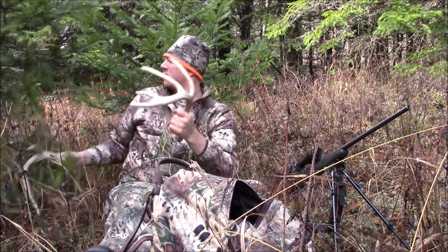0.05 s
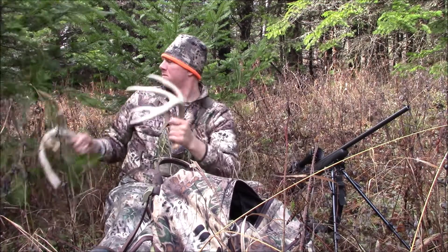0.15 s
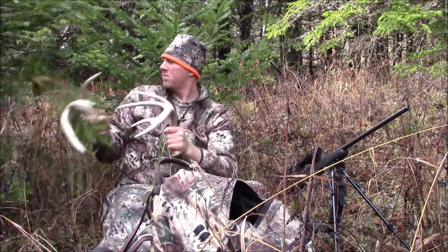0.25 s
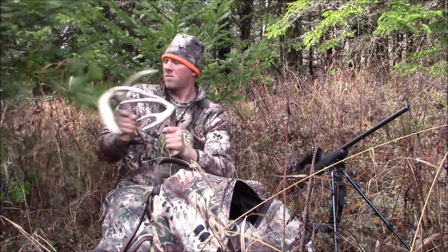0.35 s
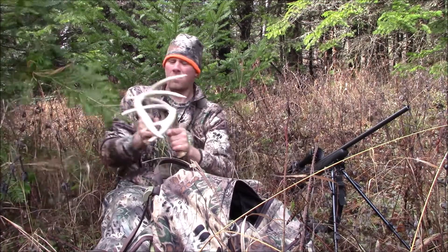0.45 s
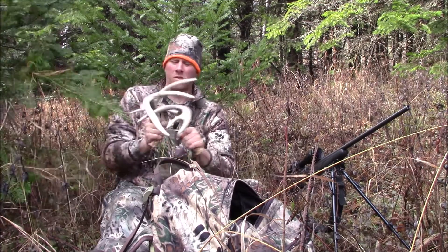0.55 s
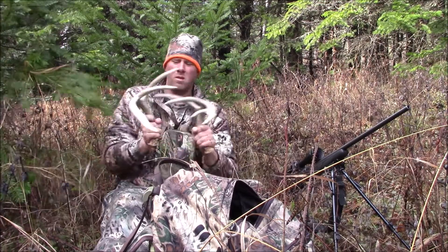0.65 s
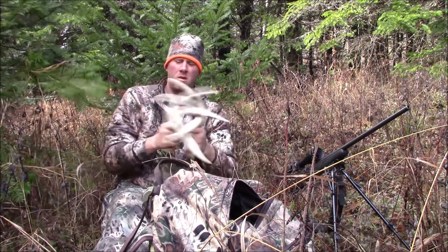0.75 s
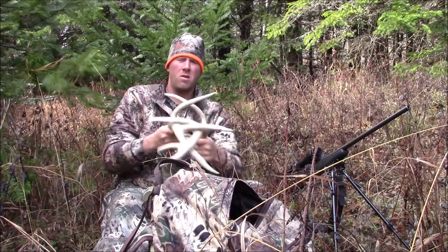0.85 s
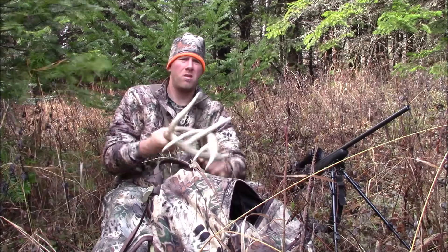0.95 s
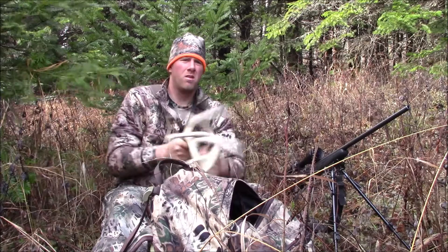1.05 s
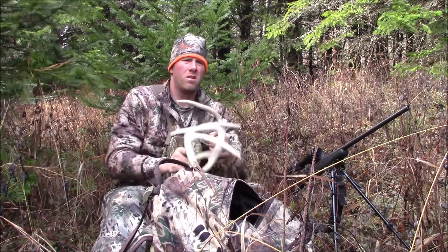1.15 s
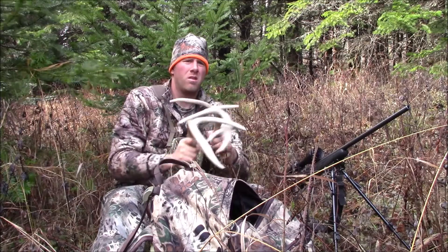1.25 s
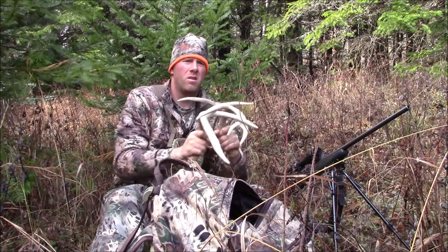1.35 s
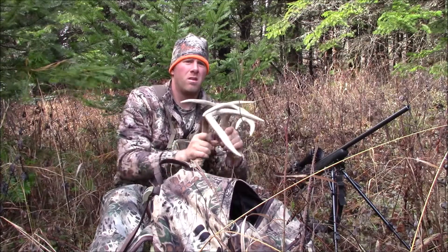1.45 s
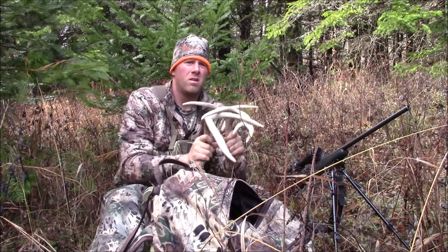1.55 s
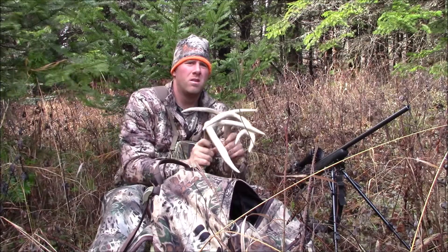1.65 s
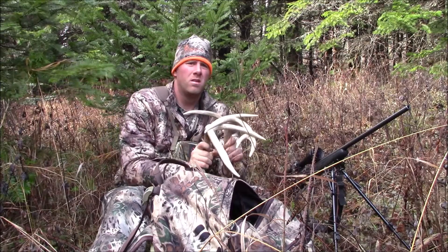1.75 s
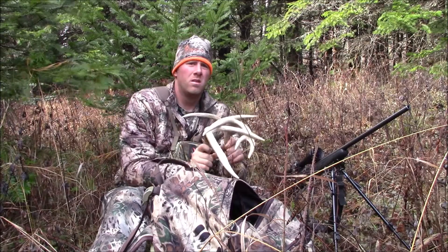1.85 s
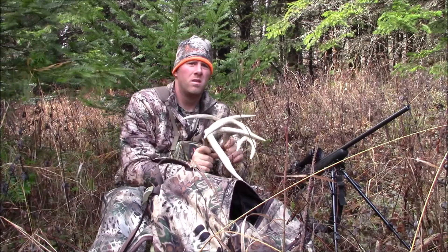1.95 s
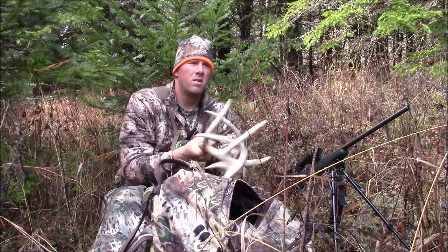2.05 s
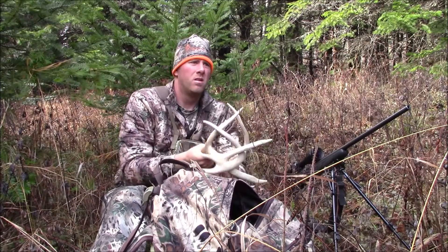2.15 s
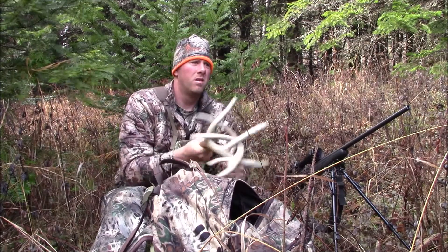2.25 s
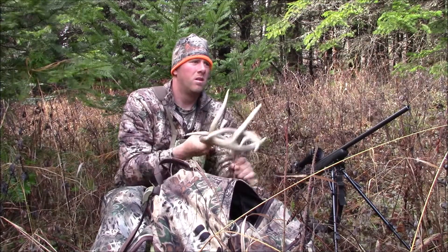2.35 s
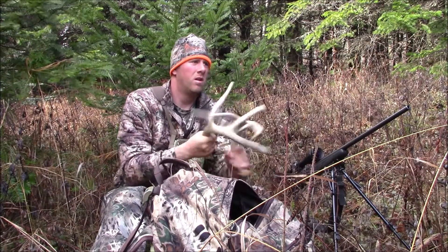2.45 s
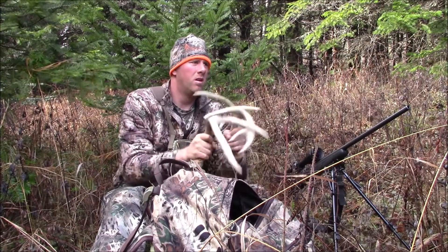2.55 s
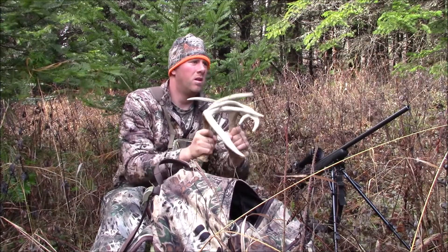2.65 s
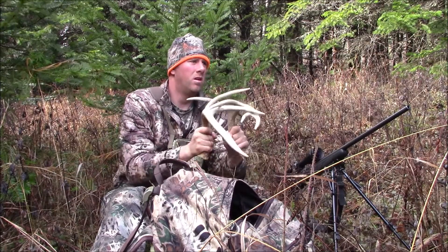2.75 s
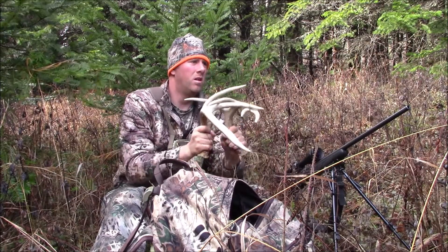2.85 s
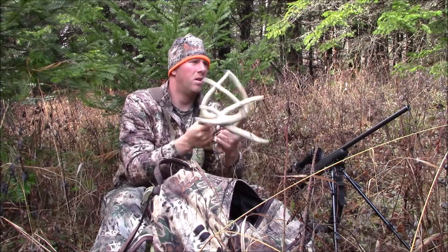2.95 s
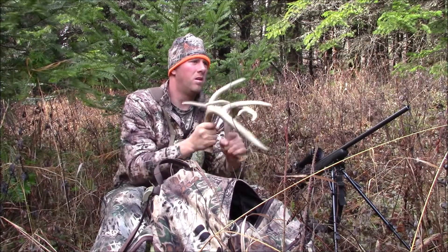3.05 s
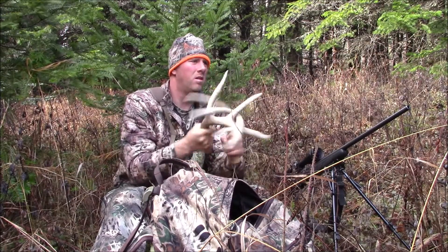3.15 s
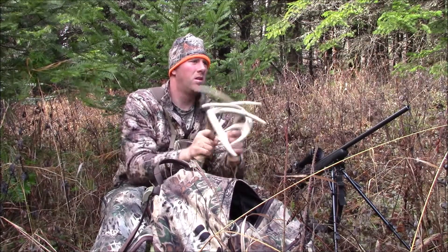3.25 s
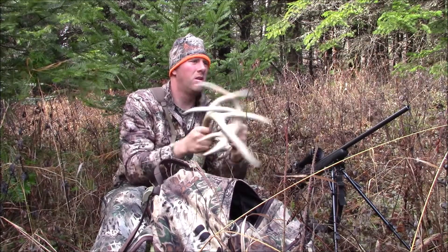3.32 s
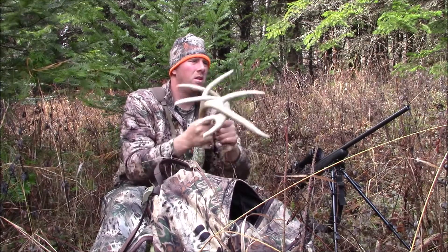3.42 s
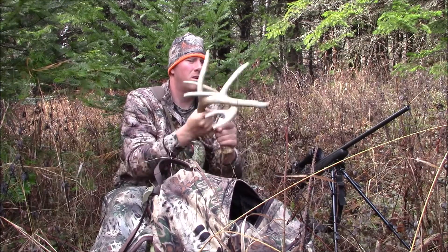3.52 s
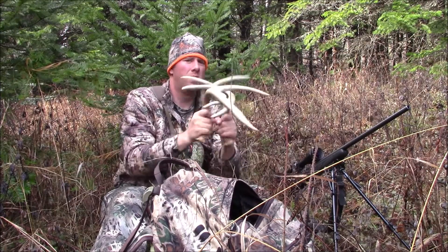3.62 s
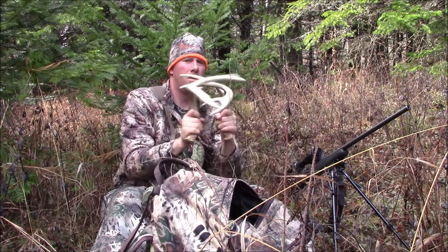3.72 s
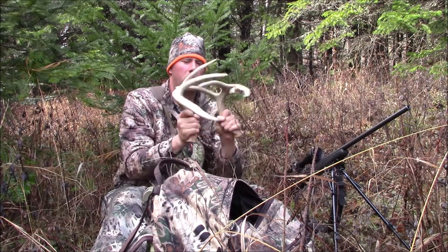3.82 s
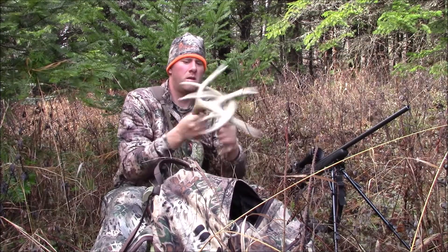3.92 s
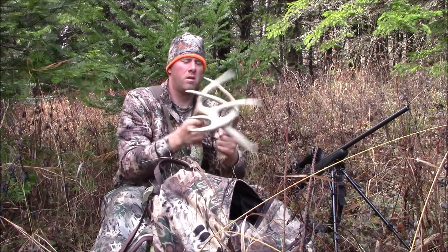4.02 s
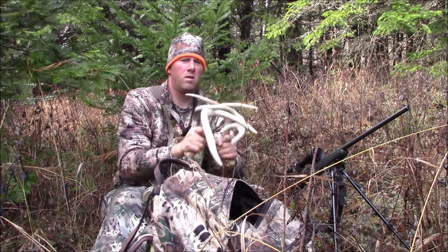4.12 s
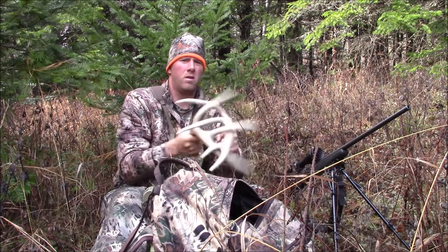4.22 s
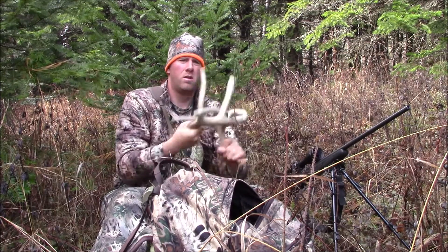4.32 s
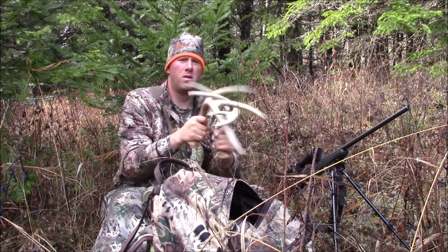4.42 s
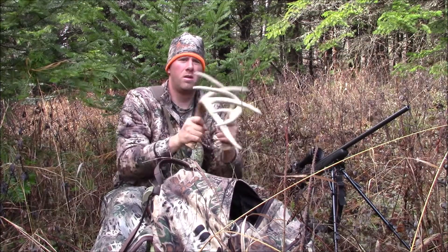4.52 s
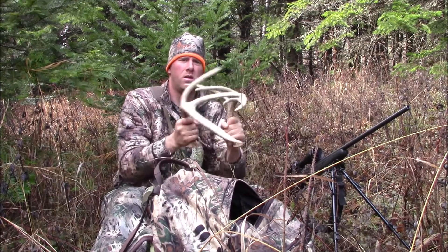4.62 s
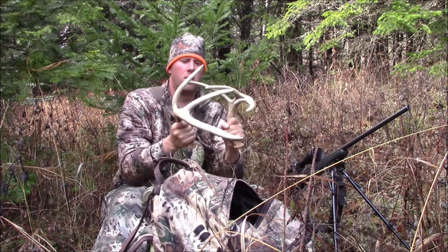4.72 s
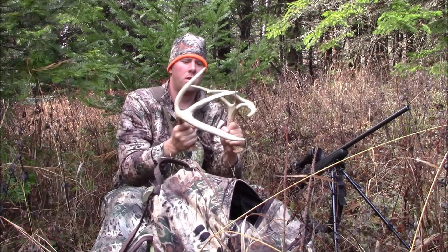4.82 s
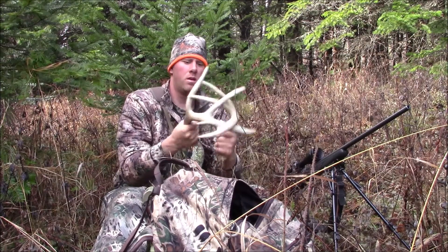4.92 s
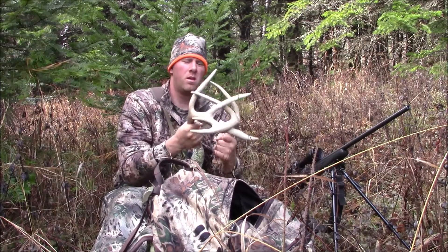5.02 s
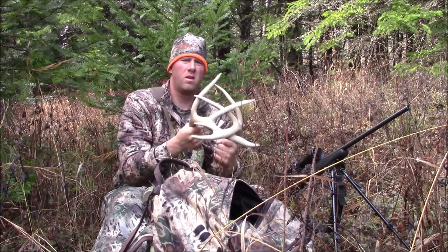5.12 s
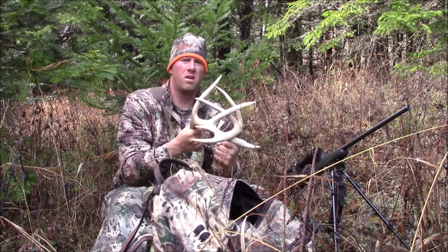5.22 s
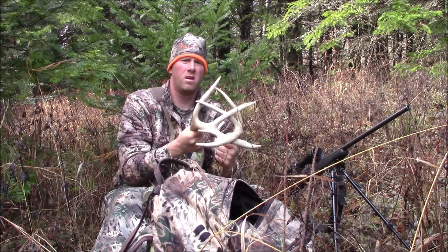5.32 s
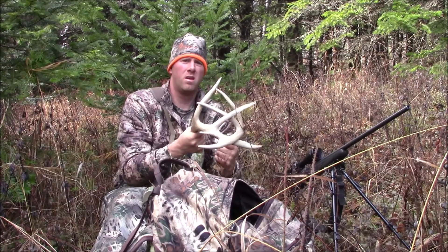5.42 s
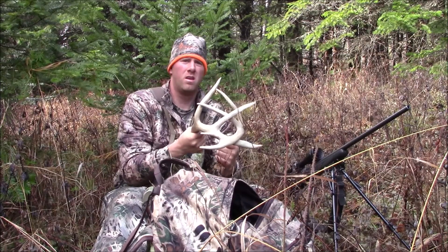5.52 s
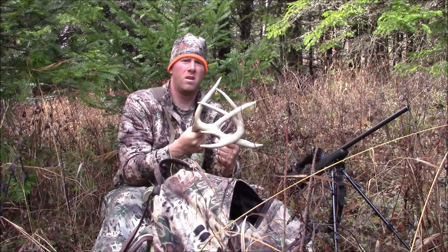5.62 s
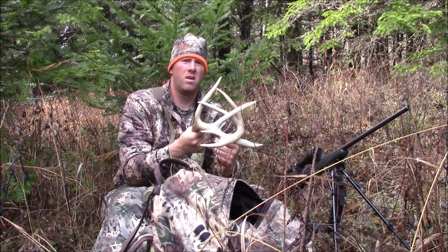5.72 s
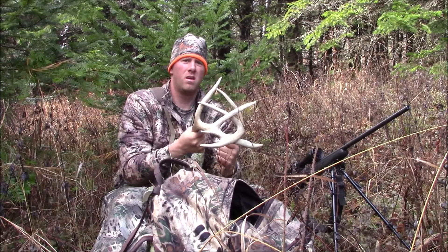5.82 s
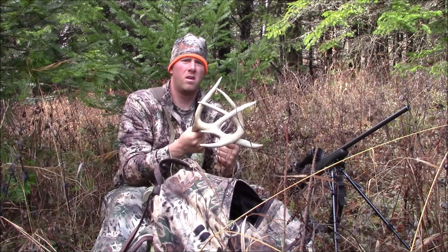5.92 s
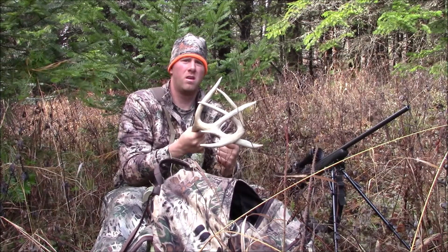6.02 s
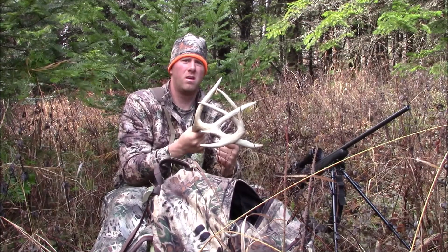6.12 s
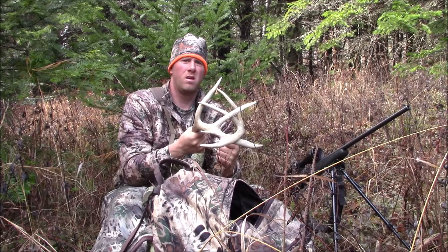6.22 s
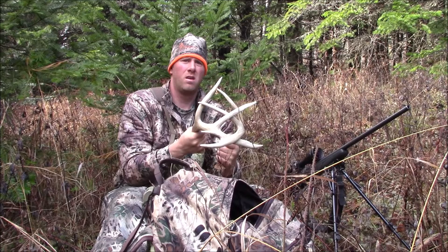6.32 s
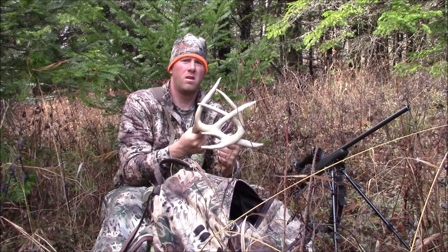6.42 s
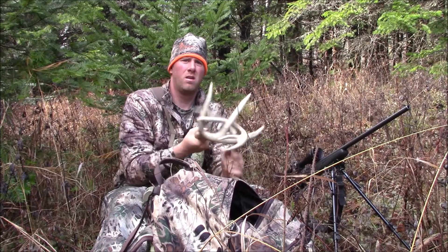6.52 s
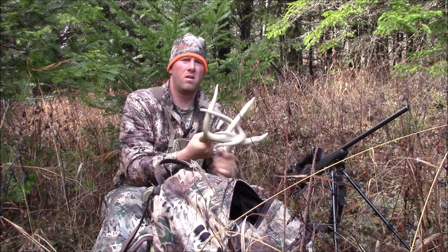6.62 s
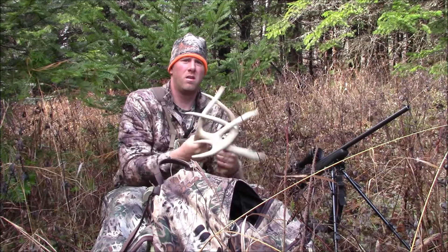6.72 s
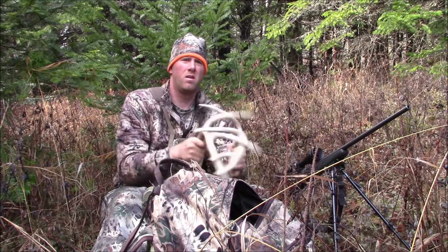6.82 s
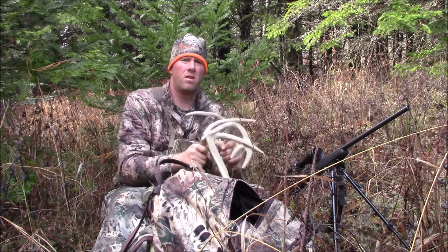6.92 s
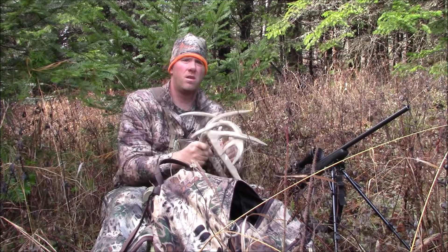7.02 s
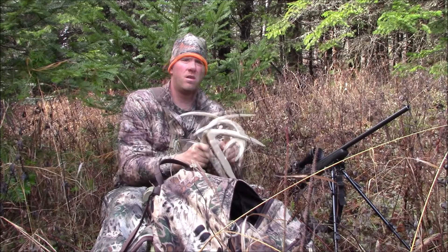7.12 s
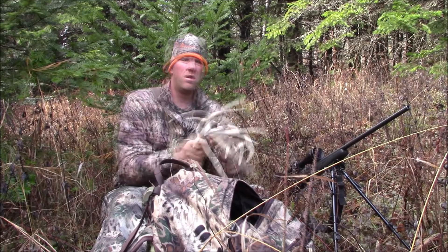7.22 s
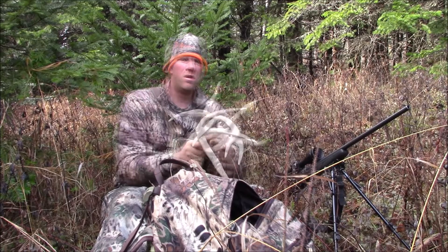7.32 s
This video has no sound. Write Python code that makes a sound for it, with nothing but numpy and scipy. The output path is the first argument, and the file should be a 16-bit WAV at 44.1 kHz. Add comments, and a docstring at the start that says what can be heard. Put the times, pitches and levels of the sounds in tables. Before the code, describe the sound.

A pair of deer antlers is clashed and rattled together in sharp, bony bursts at a forest edge, with a thin echo returning from the trees.

```python
"""A pair of deer antlers is clashed and ground together in bursts, a few metres from the microphone at a forest edge.
Each clack is a contact click plus decaying bone modes, repeated by a bouncing spray; slides are trains of tiny slips.
The trees return a thin tail: diffuse noise that follows the antlers and dies band by band, and a narrow lingering band.
A shaken bush rustles at first as patchy noise; a far cricket is a sine, stalks tick, and a quiet wood hisses behind."""
import sys
import numpy as np
from scipy import signal
from scipy.fft import rfft, irfft
from scipy.io import wavfile
from scipy.ndimage import uniform_filter1d

SR = 44100
rng = np.random.default_rng(int(sys.argv[2]) if len(sys.argv) > 2 else 0)


def invert_db(x):
    """Field ratio 10**(x/20) for x, a level in decibels (scalar or array-like)."""
    u = np.asarray(x, float) / 20
    return 10 ** u


def transcribe(signal):
    """Save signal, clipped to [-1, 1], as a 16-bit WAV file at the path in sys.argv[1]."""
    frames = np.atleast_2d(signal).T
    limited = np.clip(frames, -1, 1)
    pcm = np.round(limited * 32767).astype(np.int16)
    wavfile.write(sys.argv[1], SR, pcm)


N = 324576  # samples


def evened(x):
    """Scales to rms 1."""
    return x / np.sqrt(np.mean(x ** 2) + 1e-20)


def read(points, hz):
    """Reads a table on a log-frequency axis."""
    f, value = np.transpose(points)
    return np.interp(np.log(hz + 1), np.log(f + 1), value)


def add(mix, start_s, sound):
    """Mixes a two-channel sound in at start_s."""
    part = mix[:, round(start_s * SR):][:, :sound.shape[1]]
    part += sound[:, :part.shape[1]]


def diffuse(hz, frames, likeness, blur_bins, blur_frames):
    """Random spectra for left and right, as alike as the table says, and a map of drifting patches."""
    a, b, c, d, patches = rng.standard_normal((frames, len(hz), 5)).T
    patches = uniform_filter1d(patches, blur_bins, axis=0)
    patches = evened(uniform_filter1d(patches, blur_frames, axis=1))
    same = np.clip(read(likeness, hz), -1, 1)[:, None]
    left = a + 1j * b
    right = same * left + np.sqrt(1 - same ** 2) * (c + 1j * d)
    return np.array([left, right]), patches


def noise(spectrum, likeness, patchy_db, size):
    """Two channels of shaped noise at rms 1, with drifting patches in time and pitch."""
    hz = np.fft.rfftfreq(size, 1 / SR)
    z, patches = diffuse(hz, 4 * N // size + 5, likeness, size // 64, 6)
    z *= invert_db(read(spectrum, hz)[:, None] + patchy_db * patches)
    return evened(signal.istft(z, nperseg=size, noverlap=3 * size // 4)[1][:, :N])


# Tine meets tine in front of the microphone; level is the peak before the bass cut, sharpness is relative:
# start_s, level_db, pitch_hz (of the struck tine), sharpness_db
CLASHES = [(0.3904, -8.5, 3560, 0), (0.4135, -12, 2840, -12.5), (0.4725, -20, 1640, -28),
           (0.6281, -18.5, 2980, -4), (0.7637, 2, 3600, -6), (0.7655, -2, 3250, -8.5),
           (0.7802, -11, 3700, -9.5), (0.8094, 1.5, 3340, -18.5), (0.8216, -11.5, 3000, -21),
           (0.8357, -15, 1420, -19.5), (0.932, -20.5, 1680, -11.5), (0.9343, -17.5, 1730, -19),
           (0.955, -3, 2660, -19), (0.9722, -20.5, 2830, -27), (0.9857, -9.5, 2780, -23),
           (1.0004, -19, 1180, -8), (1.068, -19.5, 3940, -8), (1.0734, 3.5, 3066, -9),
           (1.0862, -3.5, 2970, -8.5), (1.09, -4.5, 2850, -4.5), (1.0955, 2, 2940, -8.5),
           (1.113, -4.5, 3070, -17), (1.1475, -17.5, 1310, -15), (1.1894, -35.5, 3010, -27.5),
           (1.2954, -12, 4000, -16.5), (1.3154, -23, 3080, -31), (2.0429, 2.5, 2144, -5),
           (2.0477, -2.5, 4410, -8), (2.0515, -5, 3030, -8), (2.0629, -0.5, 3001, -5),
           (2.0722, -6, 3320, -18), (2.0804, -13, 3000, -16), (2.3113, -28.5, 1010, -16),
           (2.318, -11.5, 3260, -33.5), (2.3195, -17.5, 2560, -29), (2.3278, -28.5, 1340, -23.5),
           (2.344, -31, 1300, -23), (2.357, -35.5, 1110, -25.5), (2.4549, -39.5, 4000, -2),
           (2.4984, 6.5, 3915, -4), (2.5139, -13.5, 3500, -19), (2.5322, -1, 3000, -12.5),
           (2.5527, -7.5, 2960, -15), (2.5848, -12.5, 2810, -18), (2.602, -22, 2160, -28),
           (2.926, 0.5, 3020, -9), (2.9368, -11.5, 2720, -19), (2.9477, 2, 2940, -3.5),
           (2.9609, 1.5, 3650, -9), (2.9621, -2.5, 4030, -2), (3.0489, -8, 2150, -20),
           (3.0619, -21, 3520, -23), (3.0937, -14, 3300, -23.5), (3.1513, -16.5, 2980, -41.5),
           (3.1739, -25.5, 2660, -13), (3.1864, -9, 2150, -17), (3.2117, -26.5, 1480, -15),
           (3.2202, -35, 1320, -20), (3.2333, -3, 2880, -17.5), (3.2427, -14.5, 3100, -25),
           (3.2492, -13.5, 1700, -14), (3.2653, -3.5, 3523, -7), (3.2831, -14.5, 2960, -6),
           (3.3107, -26, 2400, -12), (3.3177, -10.5, 2650, -16.5), (3.3337, -15, 2730, -13.5),
           (3.3468, -4, 2700, -13), (3.3584, -13.5, 3270, -17), (3.5027, -31, 1750, -34),
           (3.6011, -34, 1510, -33), (3.6135, -38.5, 1530, -11.5), (3.6903, -11.5, 2700, -20.5),
           (3.7039, -24.5, 3030, -22), (3.7262, -18.5, 3006, -21.5), (3.9277, .5, 2480, -9),
           (3.935, 1.5, 3170, -19.5), (3.9437, -.5, 2680, -9), (3.9496, -9.5, 2850, -24),
           (3.9613, -9, 3220, -15.5), (3.973, -6.5, 3010, -23.5), (4.061, -9.5, 4050, -18),
           (4.0739, -17.5, 2970, -16), (4.1642, -10, 3130, -22), (4.1752, -7, 3820, -2.5),
           (4.2039, -18.5, 3140, -10.5), (4.2519, -8.5, 2810, -12), (4.2722, -13.5, 2780, -15.5),
           (4.2847, -15, 1220, -21.5), (4.2983, -18, 2650, -25), (4.3071, -14, 2770, -16.5),
           (4.3196, -10.5, 1150, -19.5), (4.368, -40, 2920, -25), (4.429, -32, 1790, -18),
           (4.4505, -8.5, 3460, -12.5), (4.471, -19, 3270, -28.5), (4.4843, -21.5, 3830, -24.5),
           (4.492, -21, 3450, -18.5), (4.5552, -33.5, 1089, -17.5), (4.5748, -34.5, 1480, -18),
           (4.9277, 2.5, 4070, 0), (4.9323, 1.5, 3260, -9), (4.9485, -13, 3890, -17),
           (4.9559, -9.5, 3050, -12), (4.9622, -0.5, 3050, -5.5), (4.9738, -5, 3570, -4.5),
           (4.981, -12, 2880, -13.5), (4.9875, -22, 2930, -18.5), (6.5074, -24.5, 2350, -43),
           (6.5186, -30, 1556, -21), (6.5467, -18.5, 3110, -16.5), (6.5575, -26.5, 1505, -19.5),
           (6.654, -20, 2770, -25), (6.8016, 1, 3220, -10.5), (6.8026, -7.5, 3030, -14),
           (6.8169, -13, 1450, -20.5), (6.8446, -31.5, 3180, -26), (6.8593, .5, 4770, -3),
           (6.8696, -8.5, 3400, -20), (6.8872, -6, 3870, -12), (6.9971, -14.5, 4870, -0.5),
           (7.048, -33, 3600, -11), (7.1113, -25.5, 620, -24), (7.2307, -23.5, 2090, -22),
           (7.2389, -24, 2700, -20), (7.2827, -4.5, 2860, -12.5), (7.292, -29, 2850, 25),
           (7.2998, -20.5, 2090, -16), (7.3513, -12, 3110, -22)]
# The share of the low modes drifts from burst to burst, as the grip on the beams shifts: time_s, low_modes_db
GRIP_DRIFT = [(.4, -1), (.8, 2), (1.1, 3.5), (1.3, -4.5), (2.05, 0.5), (2.5, 0), (2.95, -4), (3.3, 0.5),
              (3.7, 0), (3.95, -1.5), (4.3, 2), (4.5, -3.5), (4.95, 0), (6.55, 0.5), (6.85, -0.5),
              (7.3, -1.5)]


def blows():
    """Each contact: a click and the ring of the bone, repeated by the chatter."""
    out = np.zeros((2, N))
    chance = rng.standard_normal((len(CLASHES), 8 * len(BONE_MODES) + 1280))
    for (start_s, level_db, pitch_hz, sharp_db), z in zip(CLASHES, chance):
        # low modes: less for hard blows, more where a thick low-pitched part is struck
        weight_db = -9 - 0.39 * level_db - 2.5 * np.log2(pitch_hz / 3000)
        weight_db += np.interp(start_s, *np.transpose(GRIP_DRIFT))
        sound = ring(level_db, pitch_hz, weight_db, sharp_db, .9, z[1280:].reshape(4, -1))
        sound /= abs(sound).max()
        sound[:, :256] += crack(sharp_db, z[:256])
        spray_ms = 3 * 2 ** (.2 * z[256])  # scattered by .2 octave
        sound = signal.fftconvolve(sound, chatter(spray_ms, z[256:1280])[None], axes=1)
        add(out, start_s, invert_db(level_db) * sound / abs(sound).max())
    return out


# What the bone rings with, before each contact reshapes it: pitch_hz, relative_level_db, base_t60_s
BONE_MODES = [(340, -20, 0.044), (498, -11, 0.03), (578, -9, .05), (644.2, -5.5, 0.046), (786, -6, 0.036),
              (898, -6.5, 0.035), (1119, -6.5, 0.064), (1297, -4.5, 0.076), (1448, -10.5, .08),
              (1457, 0, 0.036), (1685, -2.5, 0.056), (1888, -7, 0.061), (2150, -1, 0.021),
              (2350, -4.5, 0.039), (2700, -2, 0.021), (2850, -4, .04), (3050, -5, 0.06), (3260, -3, .03),
              (3560, -6, 0.059), (3744, -2, 0.044), (4060, -2, 0.033), (4397, -2.5, .03),
              (4690, -7.5, 0.021), (4903, 2, 0.023), (5440, -2.5, 0.029), (6020, -1.5, 0.024),
              (6650, 2.5, 0.015), (7670, -0.5, 0.017), (7462, 3, 0.0099), (8470, 1.5, 0.013),
              (9030, 0, 0.0076), (10360, -17, 0.0041)]


def ring(force_db, tine_hz, weight_db, sharp_db, longer, chance):
    """The modes of both antlers after one contact; where it lands decides how much each mode gets."""
    hz, db, t60 = np.transpose(BONE_MODES + BONE_MODES)[:, :, None]
    share, detune, phase, aside = chance[:, :, None]
    t = np.arange(2304, dtype=np.float32) / SR
    low = 1 / (1 + (hz / 1800) ** 4)
    high = 1 / (1 + (5600 / hz) ** 6)
    # the struck tine stands out, less so in soft knocks
    struck_db = (10.0 + 0.15 * force_db) * np.exp(-(np.log(hz / tine_hz) / 0.086) ** 2)
    heavy_db = 0.29 * force_db / (1 + (hz / 800) ** 4)  # only hard blows move the thick beams
    db = db + low * weight_db + high * sharp_db + struck_db + heavy_db + 2.3 * share
    turn = (2 * np.pi * hz * (1 + 0.023 * detune)).astype(np.float32) * t
    turn = turn + 1.5 * phase.astype(np.float32)
    # bending waves spread: high modes speak first, low ones swell in
    swell = 1 - np.exp(-t * (hz / 1.41).astype(np.float32))
    free_fall = np.exp(-t * (np.log(1000) / (t60 * longer)).astype(np.float32))
    # a quick first fall as the blow spreads through the branches, then the free ring
    fall = free_fall * (0.5 + np.exp(-t / 0.0015))
    shape = invert_db(db) * swell * fall
    # the two microphone ports see each mode from a slightly different side, more so at short wavelengths
    skew = .115 * aside * (hz / 3000) ** .5
    mid = (shape * np.sin(turn)).sum(0)
    side = (skew * shape * np.cos(turn)).sum(0)
    return np.array([mid + side, mid - side])


# Colour of the contact click: freq_hz, relative_level_db
CLICK_COLOUR = [(30, -31.5), (300, -17.5), (2000, -4), (6000, 3), (10000, -3.5), (13000, -26.5),
                (16000, -27.5), (17000, -51.5)]


def crack(sharp_db, chance):
    """The contact itself: a noise burst fading within a few milliseconds, coloured and set to a peak level."""
    burst = chance * np.exp(-np.arange(256) / SR / .0013)
    colour = invert_db(read(CLICK_COLOUR, np.fft.rfftfreq(512, 1 / SR)))
    click = irfft(rfft(burst, 512) * colour)[:256]
    return invert_db(-3.0 + sharp_db) * click / abs(click).max()


def chatter(ms, chance):
    """Knobbly bone never meets cleanly: the first touch, then a fading spray of smaller ones."""
    fade = np.exp(-np.arange(len(chance)) / SR / (max(ms, .2) / 1000))
    touches = 0.19 * chance * (abs(chance) > 2) * fade
    return np.append(1, touches[1:])


# Tines slide along each other at the same spot; level is rms before the bass cut, sharpness is relative:
# start_s, length_s, level_db, sharpness_db
GRINDS = [(.465, 0.028, -48.5, -23), (1.995, 0.025, -60.5, -4.5), (3.476, 0.021, -61.5, 0),
          (3.563, 0.057, -51, -24.5), (3.726, 0.044, -42, -12), (2.31, 0.053, -50, -23.5),
          (3.193, 0.057, -41.5, -12), (4.255, 0.069, -38, -26), (4.355, .07, -67, -18),
          (4.455, 0.042, -44.5, -22), (4.541, 0.038, -59.5, -21), (6.775, 0.025, -47.5, -12),
          (7.201, 0.069, -44, -22)]


def slides():
    """Rough bone on bone: a dense train of tiny slips through the same modes."""
    out = np.zeros((2, N))
    for start_s, length_s, level_db, sharp_db in GRINDS:
        count = round(length_s * SR)
        happens = rng.random(4000) < 2500 / SR  # 2500 slips per second on average
        slips = happens * invert_db(3.5 * rng.exponential(1, 4000))
        slips = slips[:count] * np.hanning(count) ** .7
        body = ring(-8.0, 1500, 0.071, sharp_db, .6, rng.standard_normal((4, 2 * len(BONE_MODES))))
        sound = signal.fftconvolve(slips[None], body, axes=1)
        rms = np.sqrt(np.mean(sound[:, :count] ** 2) + 1e-20)
        add(out, start_s, invert_db(level_db) * sound / rms)
    return out


# A narrow band of the echo near 3 kHz that lingers: pitch_hz, level_db, t60_s
LINGERING_ECHO_BAND = (3030, -14, .5)


def narrow_echo(x):
    """A narrow band of the echo near 3 kHz lingers after the contacts, made by a resonant filter."""
    hz, db, t60 = LINGERING_ECHO_BAND
    return invert_db(db) * signal.lfilter(*signal.iirpeak(hz, hz * t60 / 2.2, SR), x)


# How long the scatter from the surrounding trees lingers: freq_hz, t60_s
TREE_DECAY = [(300, 0.48), (700, 1), (1700, 1), (3500, 1), (5500, 0.88), (7500, 0.51), (9500, 0.49),
              (12000, .22)]
# Colour of that scatter: freq_hz, relative_level_db
TREE_COLOUR = [(200, -7), (800, -4), (3000, -7.5), (5000, -5.5), (6500, -2.5), (8500, -4), (10500, 1.5),
               (14000, 0)]
# How alike it reaches left and right: freq_hz, likeness (correlation, no unit)
TREE_LIKENESS = [(300, 0.063), (700, .2), (1500, 1), (3500, 1), (7000, 0.44), (14000, .2)]


def trees(x):
    """Trunks and twigs hear the antlers from every side, so their scatter is blurred power on diffuse noise."""
    hz, t, z = signal.stft(x.mean(0), SR, nperseg=256, noverlap=192)
    power = uniform_filter1d(abs(z) ** 2, size=7, axis=0)
    t60, late = read(TREE_DECAY, hz)[:, None], t[:1200]
    # near brush answers quickly, far trunks linger
    fall = invert_db(-60 * late / t60) + 1.7 * invert_db(-60 * late / (0.6 * t60))
    fall *= np.clip(late / 0.011 - .6, 0, 1)  # the first echo needs a few ms
    power = signal.fftconvolve(power, fall ** 2 / (fall[17] ** 2).sum(), axes=1)[:, :len(t)]
    z, patches = diffuse(hz, len(t), TREE_LIKENESS, 4, 24)  # uneven stands of trees
    z *= np.sqrt(abs(power)) * invert_db(read(TREE_COLOUR, hz)[:, None] + 1.3 * patches)
    return signal.istft(z, nperseg=256, noverlap=192)[1][:, :N]


# The bush swings to and fro; level is the rms at the crest of each swing: crest_s, level_db
BUSH_SWINGS = [(0.0, -48), (0.125, -47.5), (0.29, -52.5)]
# Colour of its leaves: freq_hz, relative_level_db
LEAF_COLOUR = [(120, -69), (200, -30.5), (601, -8), (1000, -9.5), (3190, -3), (4600, -6.5), (8120, -1.5),
               (14600, -19), (16000, -35)]


def bush():
    """Leaves brushing each other, patchy; every swing starts quickly and settles."""
    crest_s, level_db = np.transpose(BUSH_SWINGS)[:, :, None]
    late = np.arange(N) / SR - crest_s
    rise = np.clip(1 + late / .012, 0, 1)  # 12 ms up to the crest
    swings = invert_db(level_db - 44 * late) * rise  # settles by 44 dB per second
    likeness = [(200, .5), (12000, .4)]  # freq_hz, likeness
    return swings.max(0) * noise(LEAF_COLOUR, likeness, patchy_db=1.2, size=256)


# Dry stalks tick; the click peaks 3 dB below this level: start_s, level_db
STALK_TICKS = [(1.4964, -46), (1.6681, -42.5), (1.7014, -50), (1.7295, -46.5), (3.6274, -52)]


def stalks():
    """Dry stalks tick: the same short click as a contact, without any ring, a little stronger on the left."""
    out = np.zeros((2, N))
    for start_s, level_db in STALK_TICKS:
        add(out, start_s, invert_db(level_db) * crack(0, rng.standard_normal(256)) * [[1], [.8]])
    return out


# A distant cricket, stronger on the left; level is the left rms at full swell: start_s, level_db
CRICKET_CHIRPS = [(4.56, -86), (4.69, -76), (4.83, -80), (5.35, -77.5), (5.54, -83.5), (5.68, -80.5),
                  (6.02, -83), (6.15, -84.5), (6.35, -76.5)]


def cricket():
    """Each chirp is a faint steady sine that swells and fades within 59 ms."""
    out, t = np.zeros((2, N)), np.arange(2600) / SR
    chirp = np.sqrt(2) * np.sin(2 * np.pi * 5570 * t) * signal.windows.tukey(len(t), .6)
    for start_s, level_db in CRICKET_CHIRPS:
        add(out, start_s, invert_db(level_db) * chirp * [[1], [.7]])
    return out


# Colour of the quiet wood's hiss all round: freq_hz, relative_level_db
WOOD_COLOUR = [(18, -29), (30, -16.5), (287, -14), (319, -11), (394, -5.5), (461, -9.5), (844, -6),
               (1190, -7), (1350, -8), (5170, -17), (5590, -17.5), (9000, -23.5), (13700, -33),
               (16000, -50)]
# How alike it reaches left and right: freq_hz, likeness (correlation, no unit)
WOOD_LIKENESS = [(60, -0.13), (240, -0.31), (950, -0.42), (3770, -0.33), (15000, 0.098)]


def wood_hiss():
    """Steady coloured noise at -62 dB rms, with slight patches."""
    return invert_db(-62) * noise(WOOD_COLOUR, WOOD_LIKENESS, patchy_db=.6, size=1024)


def scene():
    """Antlers slightly to the left, their echo and scatter from the trees, the bush, small life and the wood's hiss."""
    # the microphone rolls off the bass below about 330 Hz
    bass_cut = signal.butter(4, 330, "high", fs=SR, output="sos")
    antlers = signal.sosfilt(bass_cut, blows() + slides())
    antlers = antlers + narrow_echo(antlers)
    placed = antlers * invert_db([[.3], [-.3]])
    return placed + invert_db(-13.0) * trees(antlers) + bush() + stalks() + cricket() + wood_hiss()


def roll_off(x):
    """The treble ends steeply here."""
    return signal.sosfilt(signal.butter(12, 16330, fs=SR, output="sos"), x)


def record(dry):
    """The hardest blows overload and bend the microphone input lopsidedly, adding a low thud; then the treble rolls off."""
    clipped = np.clip(dry, -.95, .97)
    bent = clipped + .05 * (clipped ** 4).mean(0)
    mix = signal.sosfilt(signal.butter(4, 15000, fs=SR, output="sos"), bent)
    return roll_off(mix)


dry = scene()
out = record(dry)
transcribe(out)
```